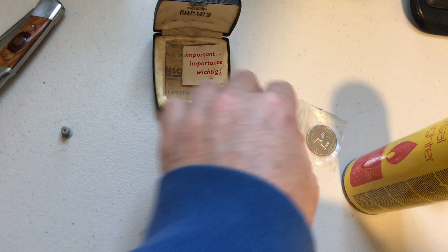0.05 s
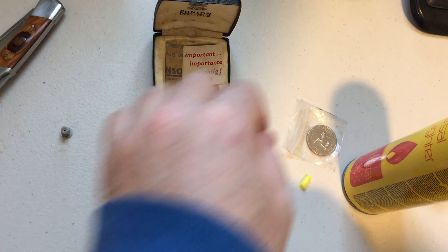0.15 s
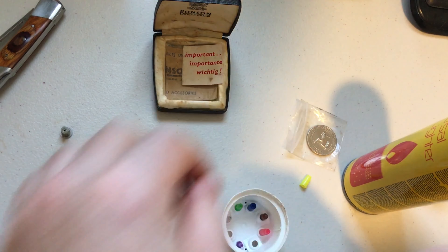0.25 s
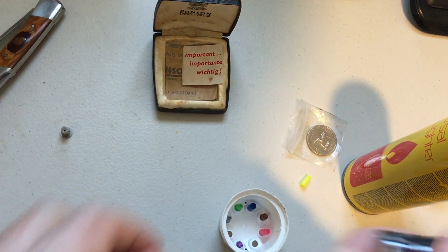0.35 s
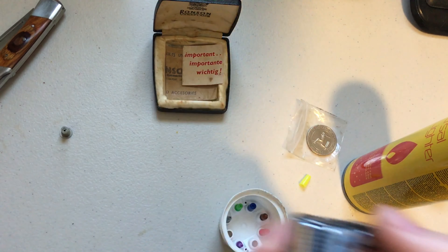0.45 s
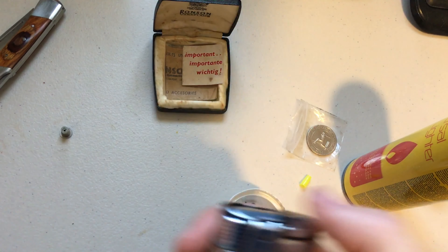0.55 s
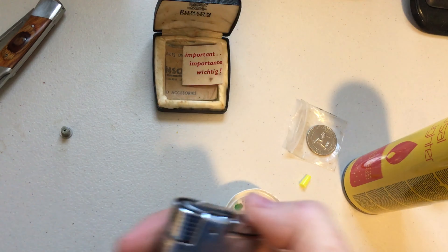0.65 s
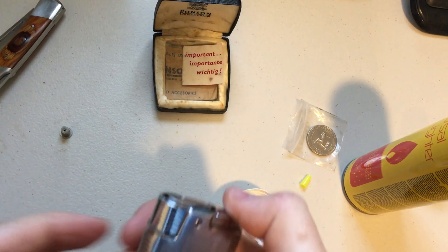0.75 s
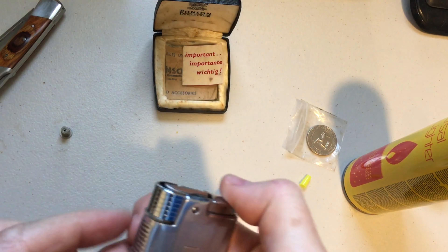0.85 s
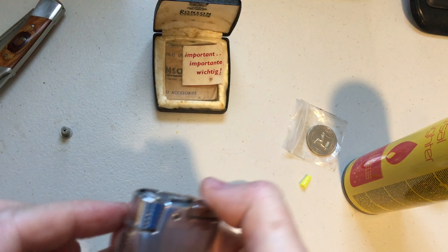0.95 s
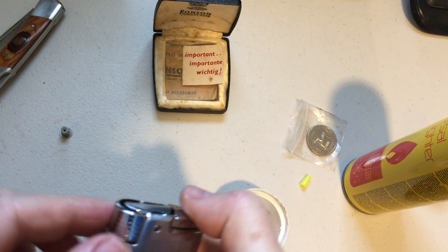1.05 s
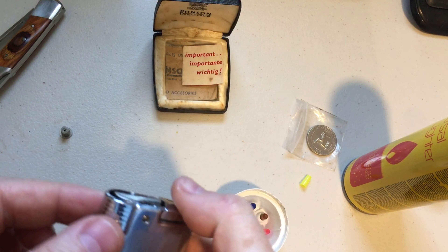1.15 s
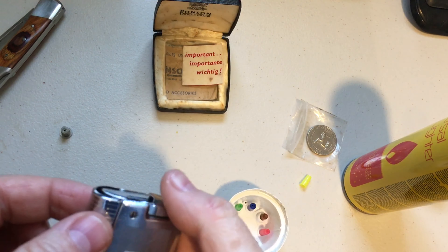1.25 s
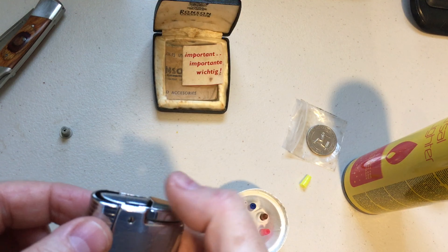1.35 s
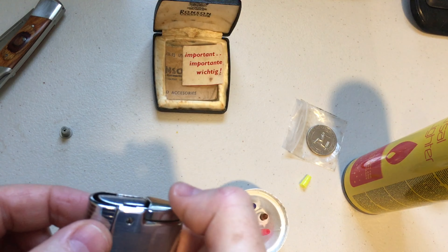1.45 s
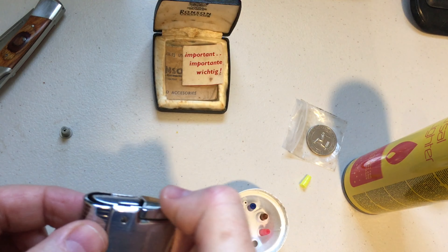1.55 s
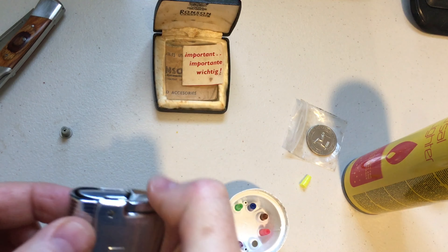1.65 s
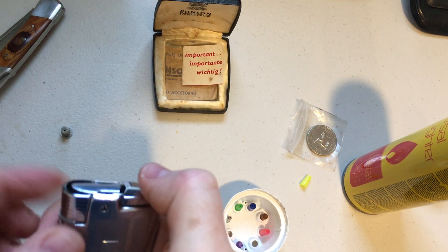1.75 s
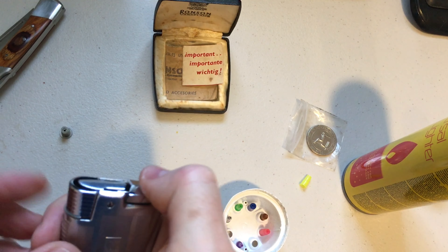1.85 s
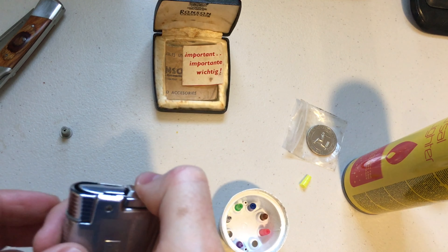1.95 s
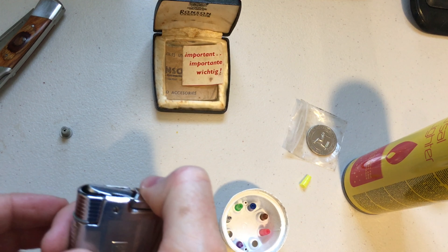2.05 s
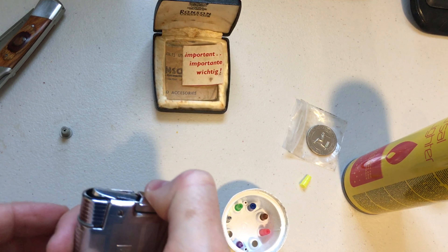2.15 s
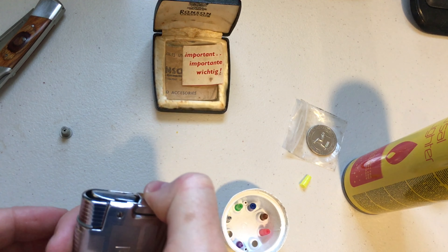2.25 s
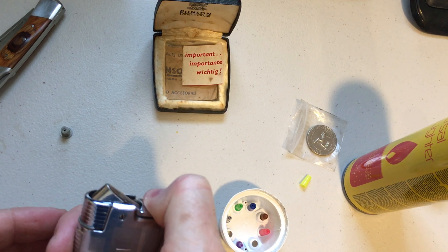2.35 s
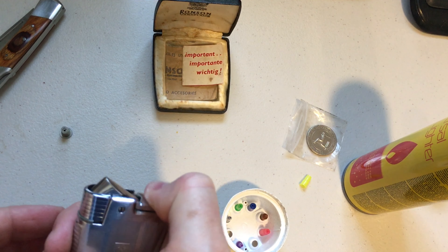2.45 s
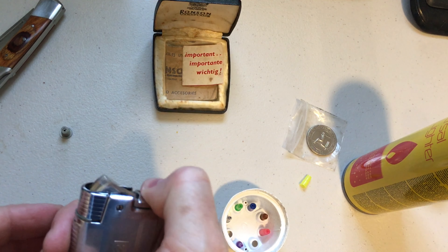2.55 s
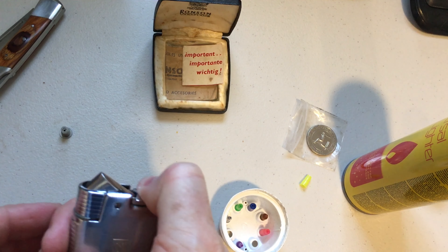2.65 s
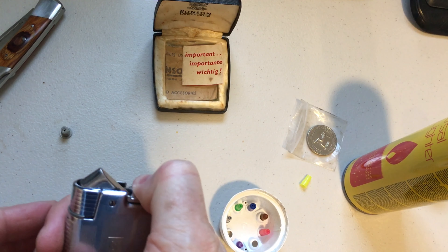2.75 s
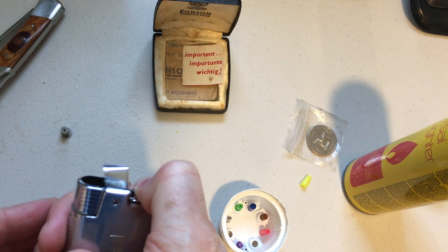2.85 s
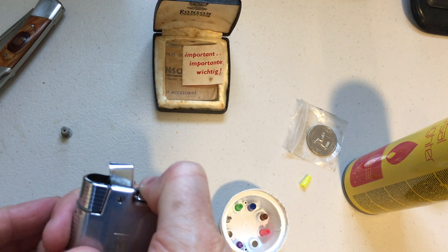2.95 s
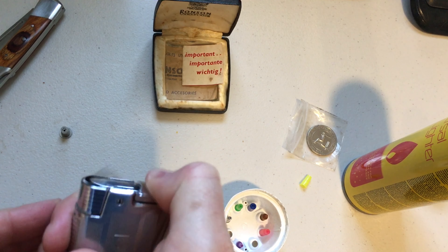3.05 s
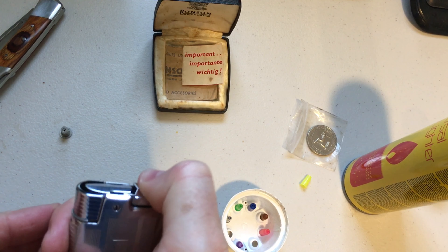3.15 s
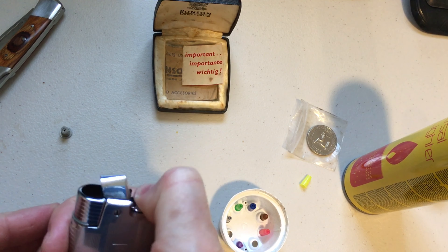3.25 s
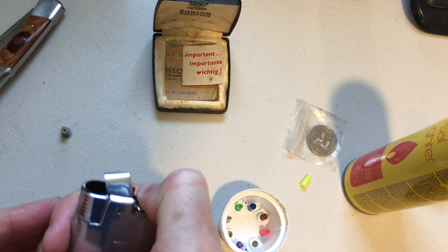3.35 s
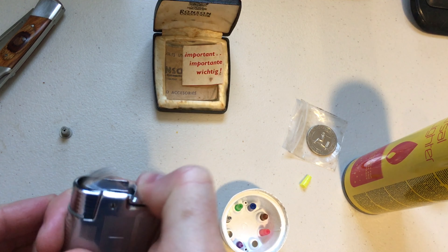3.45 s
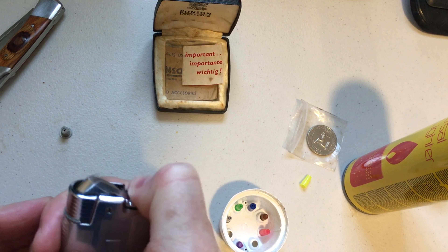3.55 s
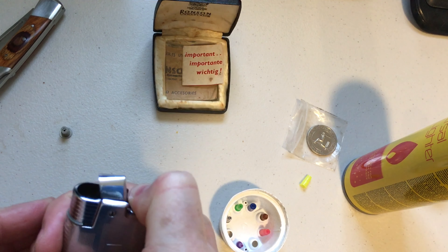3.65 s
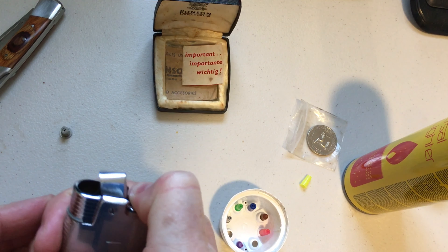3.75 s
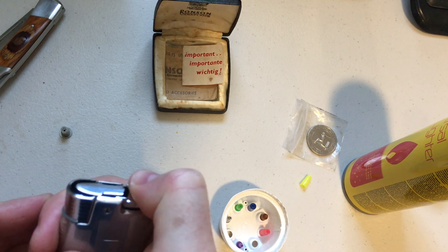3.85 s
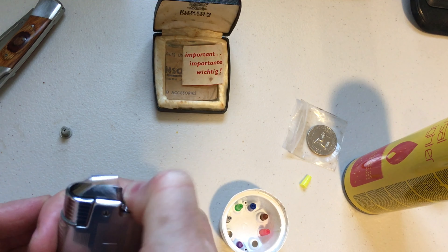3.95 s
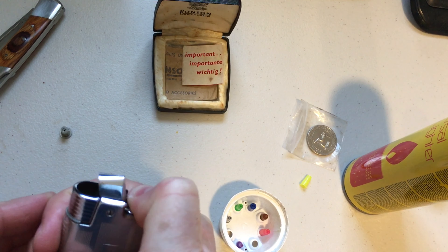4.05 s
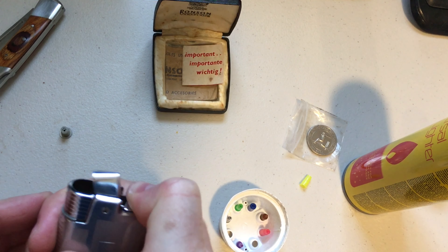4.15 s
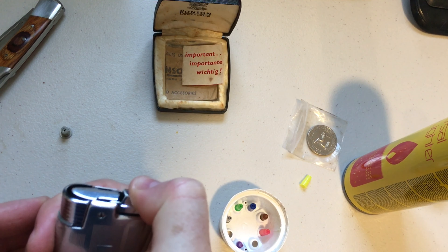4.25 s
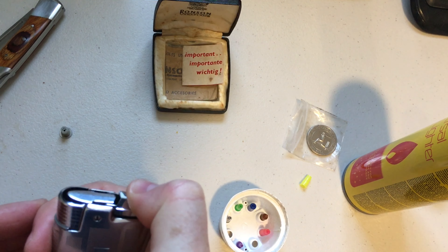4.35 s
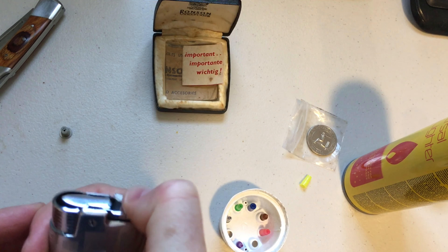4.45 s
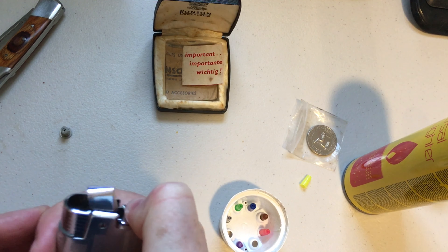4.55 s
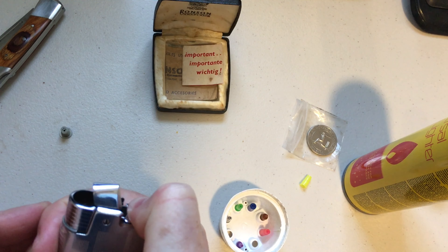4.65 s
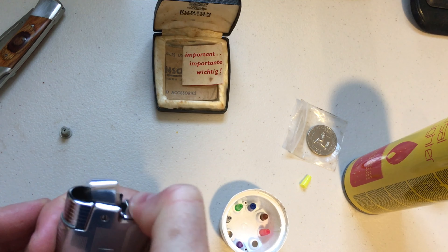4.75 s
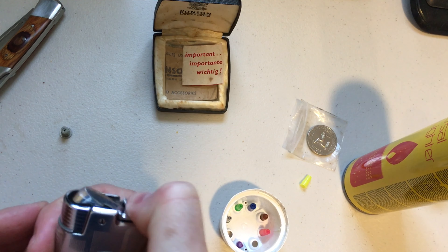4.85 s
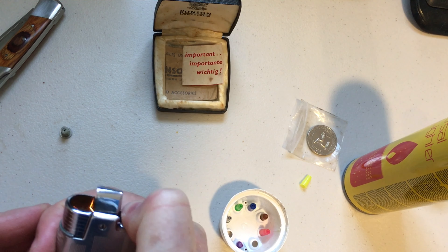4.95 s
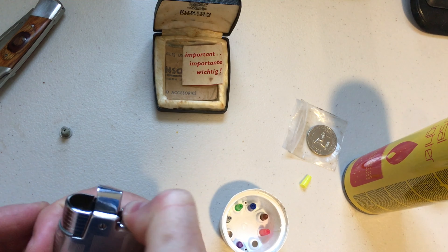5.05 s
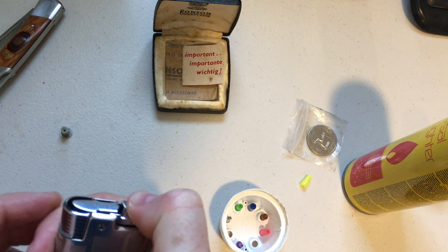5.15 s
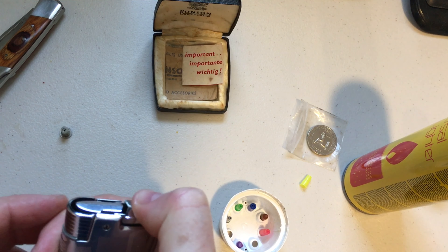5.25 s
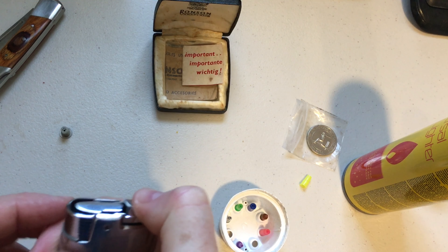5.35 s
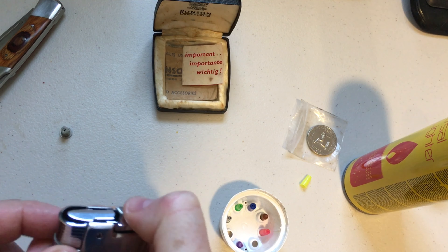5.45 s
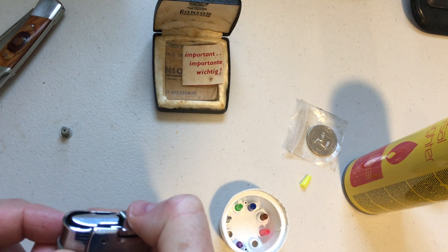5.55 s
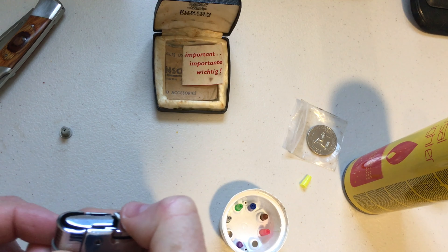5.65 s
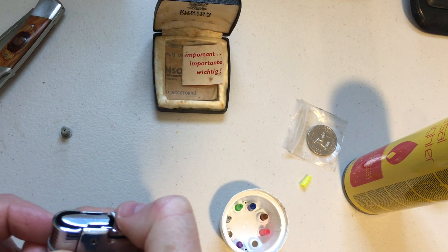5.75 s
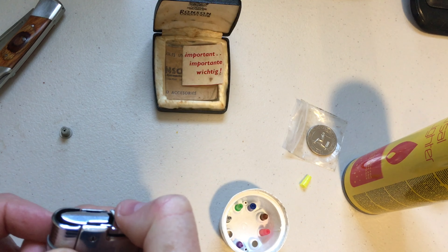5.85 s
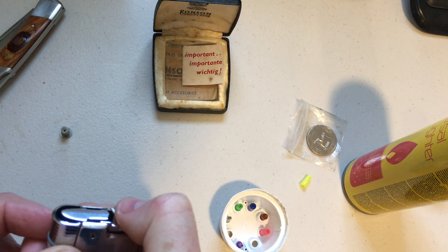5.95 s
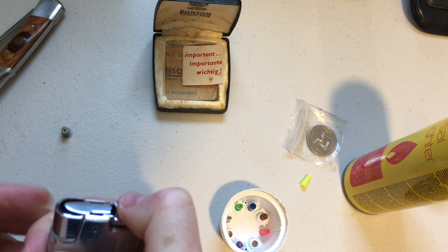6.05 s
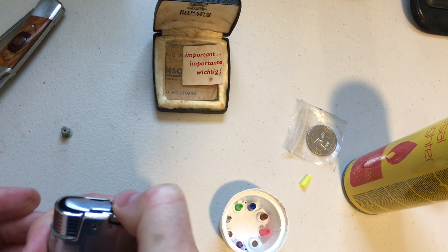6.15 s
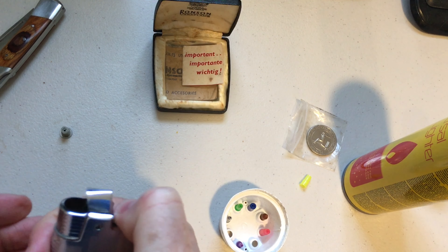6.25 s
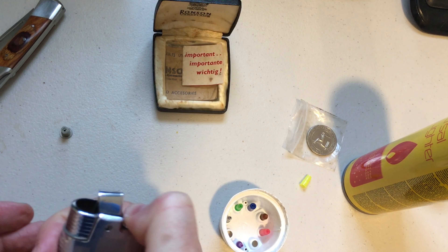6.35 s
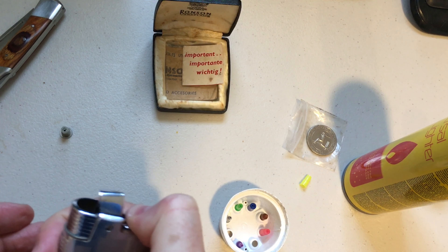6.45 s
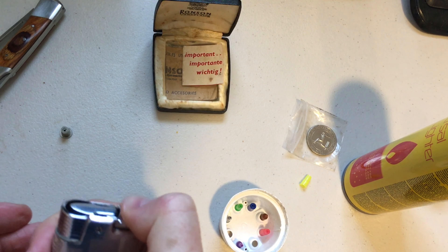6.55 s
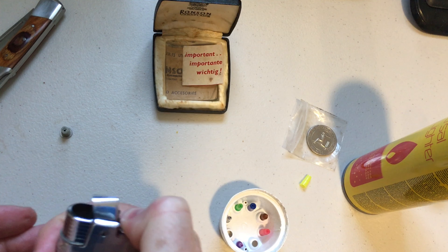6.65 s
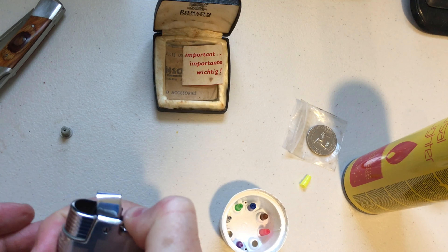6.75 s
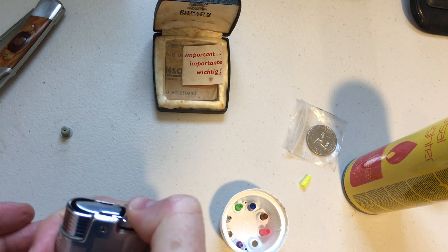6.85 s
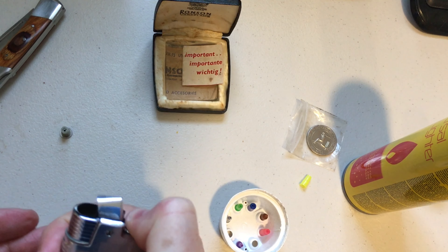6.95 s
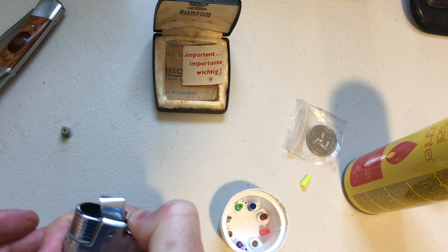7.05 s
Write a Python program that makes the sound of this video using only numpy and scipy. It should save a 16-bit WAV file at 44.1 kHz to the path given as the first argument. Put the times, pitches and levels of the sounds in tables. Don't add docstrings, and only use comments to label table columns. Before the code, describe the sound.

Close metallic clicks, flint rasps and sharp cap snaps of a lighter worked repeatedly, with gas hissing through its valve in a quiet room.

```python
import sys
import numpy as np
from scipy import signal
from scipy.fft import rfft, irfft, next_fast_len
from scipy.io import wavfile
from scipy.ndimage import uniform_filter1d

SR = 44100
rng = np.random.default_rng(int(sys.argv[2]) if len(sys.argv) > 2 else 0)


def linear_from_db(decibels):
    return 10 ** (np.asarray(decibels, float) / 20)


def wav_record(signal):
    frames = np.transpose(np.atleast_2d(signal))
    bounded = np.clip(frames, -1, 1)
    quanta = np.round(bounded * 32767).astype(np.int16)
    wavfile.write(sys.argv[1], SR, quanta)


N = 312669

# frequency in Hz, density in dB per Hz.
ROOM_SPECTRUM = [(13, -50.5), (22, -5), (152, -6.5), (278, -11.5), (310, -15.5), (347, -16), (398, -29.5),
                 (1070, -20.5), (3230, -29), (3920, -55), (5770, -42), (6810, -54), (16000, -42.5)]
ROOM_DB = -52.5
# centre in Hz, width in Hz, level in dB.
HUMS = [
    (48.7, 13, -58),
    (87, 17, -57),
    (209, 10, -66),
    (1099, 50, -74),
    (4730, 50, -76),
]
# start in seconds, end in seconds, Hz at start, Hz at end, level in dB.
WHISTLES = [
    (1.7, 2.17, 1042, 1022, -70),
    (2.19, 2.75, 997, 998, -66),
    (1.72, 2.3, 272, 270, -59.5),
    (-1, 8, 3146, 3146, -77),
]
# centre in Hz, width in Hz, level in dB, t60 in seconds.
TAIL = [(314, 160, -25, 0.34), (1140, 890, -31, 0.25), (2250, 790, -32.5, 0.17), (3640, 1400, -26, 0.22),
        (4300, 1650, -26, 0.13), (6030, 1500, -31, 0.22), (9100, 3400, -28.5, 0.22),
        (13540, 6700, -27.5, 0.2)]
# delay in ms, level in dB.
ECHOES = [
    (1.9, -9.5),
    (7.4, -22),
    (11, -34.5),
]
# time in seconds, level in dB.
SLEEVE = [
    (0, -74),
    (.15, -62),
    (.27, -64),
    (.42, -59.5),
    (.75, -62.5),
    (1.1, -73),
    (1.4, -76),
]

# time in seconds, flow in dB, turn of the nozzle toward the phone in dB.
SEEP = [(0, -70.5, 0.5), (.3, -65, 0.5), (.7, -68.5, 1), (1.17, -69, 0.5), (1.5, -68, -2.5), (2.0, -63, 1),
        (2.36, -63, 1.5), (2.69, -69.5, 10.5), (2.97, -56.5, -1), (3.15, -64.5, -1), (3.349, -56, 0),
        (4.12, -60.5, -0.5), (4.4, -59, -6), (4.72, -62, 0), (5.07, -63, -0.5), (5.26, -66, -3.5),
        (6.4, -53.5, 3), (7.09, -56.5, 1)]
# start in seconds, attack in seconds, hold in seconds, release in seconds, flow in dB.
PUFFS = [
    (1.52, 0.069, 0.16, .13, -61),
    (1.928, 0.022, 0.33, 0.098, -52),
    (5.355, 0.038, .02, 0.069, -67),
    (5.55, 0.057, .12, .1, -55.5),
    (5.583, 0.15, .35, 0.34, -49),
]
# centre in Hz, width in Hz, level in dB.
JET = [
    [(4620, 250, -10), (5200, 450, -3), (5780, 500, 0), (6450, 700, -3)],
    [(2300, 350, -7), (3080, 450, -1.5), (4100, 400, -3.5), (1500, 1500, -5)],
    [(3500, 350, 0), (2900, 1500, -5)],
    [(7300, 800, -3), (8600, 1100, 0), (9800, 900, 0)],
    [(11400, 1900, 2.5), (13000, 900, -1.5), (14100, 900, 0), (15200, 1000, -2.5)],
]
# level at the faint flow in dB, dB per dB of flow, dB per dB of turn,
# change once tipped in dB, lag in seconds.
JET_FOLLOW = [
    (-70, 1.04, .01, -0.6, 0),
    (-69, 0.69, 1.2, -3, 0),
    (-76, 0.69, .6, 6.5, 0),
    (-72.5, 0.86, 1.1, .1, .015),
    (-74.5, 0.8, 1.28, 0, .035),
]
# start in seconds, end in seconds, Hz at start, Hz at end, level in dB.
EDGES = [
    (1.94, 2.4, 11000, 10900, -63),
    (2.3, 2.85, 11700, 11100, -63.5),
    (2.0, 2.4, 14500, 14300, -65),
    (5.57, 6.02, 15000, 14000, -58),
    (5.6, 5.9, 13000, 11500, -62),
    (5.95, 6.3, 12800, 13600, -63),
    (6.28, 7.2, 6200, 6800, -62),
    (6.1, 6.35, 11300, 11300, -62),
]
FAINT_FLOW_DB, JET_DRIFT, EDGE_WIDTH_HZ = -70, .012, 900
TIPPED_S, TIP_TAKES_S = 5.2, .2

# frequency in Hz, level in dB, t60 in seconds.
SHELL = [(2020, -16, .012), (2380, -18.5, 0.013), (3280, -7, 0.0048), (3450, 0, 0.012), (3850, -2, 0.0087),
         (4150, 0.5, 0.013), (4650, -3, 0.011), (5310, -0.5, 0.011), (5950, -2, .009), (6035, -3, 0.015),
         (6805, -4.5, 0.014), (7230, -4.5, 0.026), (8150, -6.5, .008), (8830, 4, 0.0057),
         (9720, -6.5, 0.015), (11520, -5, 0.011), (11735, -7, 0.0083), (12526, -6, 0.0047),
         (13475, -2, 0.0046), (15330, -4, 0.0056), (15360, -6, .006)]
# frequency in Hz, gain in dB.
LEVER_COLOUR = [(3000, 2), (3700, -1), (5000, 0), (6000, 4), (7500, 0), (9900, -3), (12000, 0), (15000, 1)]
# frequency in Hz, gain in dB.
CAP_COLOUR = [(3000, 1), (4000, 4), (4700, 2), (5300, -6), (7000, 2), (9900, 4), (13000, -4), (15000, -2)]
# time in seconds, one centre in Hz, its gain in dB,
# other centre in Hz, its gain in dB.
GRIPS = [(2.801, 13370, -8.0, 4540, -12.0), (2.801, 3950, -8.0, 8790, -9.0),
         (3.068, 5020, 11.0, 13370, -5.0), (3.068, 2350, 10.0, 3870, 3.0), (3.249, 7190, 5.0, 2590, -12.0),
         (3.249, 3230, 4.0, 2000, -8.0), (3.477, 13640, 6.0, 4450, -5.0), (3.477, 7490, 5.0, 5220, 5.0),
         (3.588, 6380, 7.0, 9140, -12.0), (3.588, 3950, -5.0, 3110, -8.0), (3.85, 4030, 5.0, 3430, -10.0),
         (3.85, 5330, -4.0, 10520, -5.0), (3.972, 5220, 10.0, 2390, -11.0), (3.972, 6130, 5.0, 9330, -5.0),
         (4.213, 2300, 8.0, 2650, -7.0), (4.213, 6770, -5.0, 4920, -5.0), (4.559, 2040, 12.0, 14200, -7.0),
         (4.559, 6910, 7.0, 4110, 4.0), (4.796, 8610, 3.0, 2590, -8.0), (4.796, 6130, 3.0, 15080, -3.0),
         (4.94, 5550, 10.0, 3170, -12.0), (4.94, 4110, 7.0, 8790, -6.0), (5.122, 12850, 8.0, 7340, 5.0),
         (5.122, 4450, 7.0, 3170, 7.0), (6.257, 2980, 12.0, 4540, -9.0), (6.257, 2170, 12.0, 6770, -3.0),
         (6.528, 3570, 4.0, 5220, -9.0), (6.528, 13110, -7.0, 3170, -8.0), (6.64, 10730, 6.0, 6910, -7.0),
         (6.64, 5890, 5.0, 9140, -4.0), (6.852, 2350, 8.0, 5020, -12.0), (6.852, 10110, -6.0, 13110, -12.0),
         (6.958, 8790, -8.0, 2210, -12.0), (6.958, 2980, -8.0, 13640, -9.0),
         (4.49, 2980, 12.0, 2000, -12.0), (4.49, 12340, 7.0, 3430, 6.0), (3.917, 5330, 7.0, 2700, -8.0),
         (3.917, 3640, 6.0, 7050, 5.0)]
# time in seconds, Hz, dB, Hz, dB.
LIGHT_GRIPS = [
    (1.97, 3200, 8, 4150, -10),
    (.298, 1800, 4, 5000, -10),
]
GRIP_WIDTH, GRIP_HOLDS_S = .08, .022
# start in seconds, frequency in Hz, peak in dB, t60 in seconds.
FREE_RINGS = [(2.5727, 2360, -37, 0.026), (4.2935, 2380, -56, .08), (4.294, 3830, -56, .1),
              (4.4991, 2380, -28.5, 0.025), (4.861, 2350, -34.5, 0.072), (2.8015, 3420, -16.5, .05),
              (3.0725, 3900, -33, 0.12), (4.558, 4150, -24, .04), (4.9401, 4070, -18, 0.04),
              (5.125, 4674, -14, 0.042), (6.2573, 3450, -22, 0.056), (6.532, 3660, -22, 0.076),
              (6.641, 3450, -16, 0.036), (6.855, 4150, -17.5, 0.039), (6.9585, 3500, -18, 0.044)]

# peak time in seconds, peak in dB, rise in ms, shell share in dB,
# thud share in dB.
STRIKES = [
    (3.0716, -4, 0.46, -8.5, -21),
    (3.4816, -8.5, .9, -11, -11.5),
    (3.8531, -4.5, 1.1, -8.5, -17),
    (4.2184, -7, .8, -7.5, -14),
    (4.7993, -6, 1.8, -9.5, -16),
    (5.1247, -4, 1., -11.5, -17.5),
    (6.5311, -4, 1.5, -3, -14),
    (6.8542, -5, .5, -0.5, -13.5),
]
# time in seconds, peak in dB.
PAWLS = [
    (3.059, -12.5),
    (3.47, -13),
    (3.8433, -16),
    (4.2057, -13),
    (4.7894, -13.5),
    (5.1154, -16.5),
    (6.5228, -12),
    (6.8457, -16.5),
]
# peak time in seconds, peak in dB, shell share in dB, bright share in dB, thud share in dB.
SNAPS = [
    (2.8004, -2, -5.5, -2.5, -29),
    (2.8017, -12, -7, -4, -33),
    (3.2492, -5, -6, -2, -23),
    (3.5878, -3.5, -6, -2.5, -16.5),
    (3.9716, -3.5, -6.5, -2.5, -16),
    (4.5595, -6, -6.5, -1.5, -19),
    (4.9397, -1, -5.5, -4, -13.5),
    (6.2573, -4, -5, -3, -11.5),
    (6.6402, -4, -6, -2, -19),
    (6.9578, -4, -8, -1.5, -18.5),
]
# catch time in seconds, catch in dB, ms until it seats, seat in dB, seat rise in ms.
RETURNS = [
    (3.1846, -23, 12.8, -24, 1.8),
    (3.5232, -23, 15.2, -23, 0.9),
    (3.9108, -22, 13.2, -21, 1.6),
    (4.476, -22, 21.6, -16.5, 0.36),
    (4.8543, -26.5, 12.3, -29.5, 3),
    (6.1677, -30.5, 26.5, -36, 3.2),
    (6.5808, -24, 16.9, -24, 1.4),
    (6.9035, -24, 14.7, -25.5, 1.8),
]
# time in seconds, peak in dB.
SKIPS = [
    (3.1888, -27),
    (3.532, -29),
    (3.916, -27),
    (4.4855, -29),
    (4.8592, -27),
    (6.1852, -29),
    (6.5868, -23),
    (6.9106, -21.5),
]
# time in seconds, peak in
# dB.
TEETH = [(3.48, -11), (3.8553, -9), (4.2152, -16), (4.217, -10), (5.1203, -19), (5.1268, -7), (6.8567, -12),
         (4.5614, -11), (6.2593, -9), (3.9698, -24), (4.9472, -27), (4.4998, -27), (2.8085, -27)]
# time in seconds, peak in dB, rise in ms.
TOUCHES = [(2.7945, -53, 4.), (3.035, -43, 0.62), (3.2405, -32, 4.7), (3.447, -38, 1.3),
           (3.462, -37.5, 3.9), (3.577, -37, 2.9), (3.825, -39, 1.3), (3.831, -46.5, 1.4),
           (3.9579, -38, 1.5), (4.185, -36, 0.79), (4.193, -42, 3.), (4.199, -39, 2.3), (4.549, -32, 3.7),
           (4.7712, -32, .5), (5.106, -40.5, 1.1), (6.1838, -27, 0.5), (6.514, -37, 0.65), (6.83, -36, .8),
           (6.8431, -36, 1)]
# time in seconds, peak in dB, rise in ms, shell share in dB, thud share in dB.
TICKS = [(.298, -52, 1.5, 3, 15), (1.951, -45, .4, 2, -6), (1.968, -51, 1., 1, -14),
         (1.9806, -40, 0.82, 4, -22), (2.226, -39, 1.5, -6, -20), (2.3038, -36, 3.7, -4, -26),
         (2.3083, -31.5, .6, -19, -16), (2.3197, -19.5, .3, -6, -29), (2.4675, -31, 1, -7, -33),
         (2.48, -41, 1.2, -1, -19), (2.4978, -41.5, 1.9, -3, -22), (2.5435, -32, .34, -6, -18),
         (2.5666, -41, 4.8, -2, -23), (2.5723, -29, 0.22, -8.5, -20), (2.715, -46.5, 4, -5.5, 9),
         (2.7613, -37.5, 2.9, -1, -19), (2.7857, -40.5, 1.2, 2.5, 8.5), (4.294, -38.5, .55, -4, -16),
         (4.8992, -34.5, 2.3, -3, -27), (4.912, -42, 2.7, 7.5, 4), (6.939, -28, .7, -3, -31)]
# contact time in seconds, level at the contact in dB.
CAP_SLIDES = [
    (2.801, -26),
    (3.25, -28.5),
    (3.5868, -26.5),
    (3.9717, -26),
    (4.5593, -20.5),
    (4.9397, -39.5),
    (6.2564, -18),
    (6.637, -21),
    (6.958, -32),
]

# rise in ms, shell share in dB, bright share in dB, thud share in dB.
PAWL = (-0.4, -10.5, -3, -35)
BITE = (-2.6, -4.5, -11.5, -48.5)
CATCH = (0.1, -2.5, -9, -50)
SKIP = (1.3, -7.5, -1.5, -15)
TOOTH = (.3, -7, -3, -30)
SLIP = (0.26, -8.5, -2, -31)
# shell share in dB, bright share in dB, thud share in dB.
SEAT_SHARES_DB = (-4, -7.5, -20)
TOUCH_SHARES_DB = (-4.5, -5.5, -14)
# level at the contact in dB, level before it in dB.
PAWL_SLIDE_DB = (-30.5, -46)
CATCH_SLIDE_DB = (-31, -63)
SNAP_SLIDE_FAR_DB = -43.5
BITE_DB, BITE_AFTER_S = -14, .0072
SLIP_DB, GRIND_BRIGHT_DB = -3, -1.5
SNAP_RISE_MS, TICK_BRIGHT_DB, TICK_TRADE = 0.426, -10.5, 0.99
MIC_TOP_HZ = 15750


def level(x, db):
    return x * linear_from_db(db) / np.sqrt(np.mean(x ** 2))


def peak(f, hz, width_hz):
    return 1j * f * width_hz / (hz ** 2 - f ** 2 + 1j * f * width_hz)


def noise(shape):
    size = next_fast_len(N)
    f = np.fft.rfftfreq(size, 1 / SR) + 1
    re, im = rng.standard_normal((2, len(f)))
    return level(irfft((re + 1j * im) * shape(f), size)[:N], 0)


def walk(rate_hz):
    k = int(SR / rate_hz)
    steps = np.repeat(rng.standard_normal(N // k + 1), k)
    return 1.3 * uniform_filter1d(uniform_filter1d(steps, k), k)[:N]


def gliding(hz, width_hz):
    size = next_fast_len(N)
    re, im = rng.standard_normal((2, size))
    lowpass = 1 + (2 * np.fft.fftfreq(size, 1 / SR) / width_hz) ** 2
    slow = np.fft.ifft((re + 1j * im) / lowpass)[:N]
    carrier = np.exp(2j * np.pi * np.cumsum(hz) / SR)
    return level(np.real(slow * carrier), 0)


def room_tone():
    hz, db = np.transpose(ROOM_SPECTRUM)
    dull = lambda f: linear_from_db(np.interp(np.log(f), np.log(hz), db) - 5 * (f > 650))
    out = linear_from_db(ROOM_DB + .6 * walk(2.7)) * noise(dull)
    for hum_hz, width_hz, hum_db in HUMS:
        out += linear_from_db(hum_db + 2 * walk(6.0)) * noise(lambda f: peak(f, hum_hz, width_hz))
    t = np.arange(N) / SR
    for t0, t1, hz0, hz1, tone_db in WHISTLES:
        gate = np.clip(np.minimum(t - t0, t1 - t) / 0.013, 0, 1)
        phase = 2 * np.pi * np.cumsum(np.interp(t, [t0, t1], [hz0, hz1])) / SR
        out += np.sqrt(2) * gate * linear_from_db(tone_db + .8 * walk(23)) * np.sin(phase)
    return out


def sleeve():
    db = np.interp(np.arange(N) / SR, *np.transpose(SLEEVE))
    cloth = noise(lambda f: peak(f, 1300, 3000) ** 2 + 2.54 * peak(f, 440, 350) ** 2)
    return cloth * linear_from_db(db + 2.2 * walk(27))


def room(x, size=16384):
    t = np.arange(size) / SR
    fast = next_fast_len(N)
    f = np.fft.rfftfreq(fast, 1 / SR) + 1
    answer = np.zeros(size)
    for ms, db in ECHOES:
        late = np.maximum(t - ms / 1000, 0)
        answer += linear_from_db(db - 10) * (late > 0) * np.exp(-late / 0.00028) * rng.standard_normal(size)
    out = x + signal.fftconvolve(x, answer)[:N]
    spectrum = rfft(x, fast)
    ringing = lambda f: (np.abs(shell(f, 0, 1)) + .25) ** .8
    for hz, width_hz, db, t60 in TAIL:
        energy = irfft(spectrum * peak(f, hz, 0.57 * hz), fast)[:N] ** 2
        decay = np.exp(-2 * np.log(1000) * t / t60) * np.clip(t / 0.0025, 0, 1)
        held = np.sqrt(np.abs(signal.fftconvolve(energy, decay)[:N]))
        out += linear_from_db(db - 21.0) * held * noise(lambda f: peak(f, hz, width_hz) ** 2 * ringing(f))
    return out


def leak():
    t = np.arange(N) / SR
    s, seep_db, turn_db = np.transpose(SEEP)
    power = linear_from_db(2 * np.interp(t, s, seep_db))
    for start, attack, hold, release, db in PUFFS:
        corners_s = np.cumsum([start, attack, hold, release])
        power = power + linear_from_db(2 * np.interp(t, corners_s, [-72, db, db, -72], -200, -200))
    flow_db = 10 * np.log10(power) - FAINT_FLOW_DB
    turn_db = np.interp(t, s, turn_db)
    tipped = np.clip((t - TIPPED_S) / TIP_TAKES_S, 0, 1)
    out, flutter = 0, walk(42)
    for (base_db, per_flow, per_turn, tip_db, lag_s), peaks in zip(JET_FOLLOW, JET):
        lagged_db = np.interp(t - lag_s, t, flow_db)
        db = base_db + per_flow * lagged_db + per_turn * turn_db + tip_db * tipped
        drift = walk(3)
        for hz, width_hz, share_db in peaks:
            band = gliding(hz * (1 + JET_DRIFT * drift), width_hz)
            wander_db = 1.2 * flutter + 1.3 * walk(7)
            out = out + band * linear_from_db(db + share_db - 4.5 + wander_db)
    for t0, t1, hz0, hz1, db in EDGES:
        swell = np.sin(np.pi * np.clip((t - t0) / (t1 - t0), 0, 1)) ** .6
        band = gliding(np.interp(t, [t0, t1], [hz0, hz1]), EDGE_WIDTH_HZ)
        out = out + swell * linear_from_db(db + flutter) * band
    return out


def shell(f, scatter_db, detune):
    hz, db, t60 = np.transpose(SHELL)[:, :, None]
    signs = (-1.) ** np.arange(len(hz))[:, None]
    modes = peak(f, hz * detune, np.log(1000) / np.pi / t60) * signs
    return np.sum(linear_from_db(db + scatter_db) * modes, axis=-2)


def free_rings(size=8192):
    s, hz, db, t60 = np.transpose(FREE_RINGS)[:, :, None]
    t = np.arange(size) / SR
    wobble = 1 + 0.028 * uniform_filter1d(rng.standard_normal((len(s), size)), size=120, axis=1) * 11
    tone = np.sin(2 * np.pi * np.cumsum(hz * wobble, axis=1) / SR)
    sound = linear_from_db(db - 60 * t / t60) * (1 - np.exp(-t / .0008)) * tone
    line = np.zeros(N + size)
    np.add.at(line, (s * SR).astype(int) + np.arange(size), sound)
    return line[:N]


def approaches():
    pawls = [(row[0], *PAWL_SLIDE_DB) for row in PAWLS]
    catches = [(row[0], *CATCH_SLIDE_DB) for row in RETURNS]
    return pawls + catches + [(*row, SNAP_SLIDE_FAR_DB) for row in CAP_SLIDES]


def slides():
    t, swell = np.arange(N) / SR, np.zeros(N)
    before_s = np.array([0.038, 0.012, -0.0051, -0.005, -0.01])
    for s, near_db, far_db in approaches():
        swell += linear_from_db(np.interp(t, s - before_s, [-70, far_db, near_db, near_db, -70], -200, -200))
    grit = noise(lambda f: shell(f, 0, 0.88) + linear_from_db(1.5) * peak(f, 8300, 13000))
    return swell * grit * linear_from_db(2 * walk(500) - 1)


def colour(f, cap):
    lever_db = np.interp(f, *np.transpose(LEVER_COLOUR))
    cap_db = np.interp(f, *np.transpose(CAP_COLOUR))
    return linear_from_db(np.where(cap > 0, cap_db, lever_db))


def grip(f, s):
    bump = lambda hz: np.exp(-(np.log(f / hz) / GRIP_WIDTH) ** 2)
    db = 0
    for at, one_hz, one_db, other_hz, other_db in list(GRIPS) + list(LIGHT_GRIPS):
        held = np.abs(s - at) < GRIP_HOLDS_S
        db = db + held * (one_db * bump(one_hz) + other_db * bump(other_hz))
    return linear_from_db(db)


def hits():
    rows = []
    for (s, db, rise_ms, low_db, thud_db), (pawl_s, pawl_db) in zip(STRIKES, PAWLS):
        rows += [(s, db, rise_ms, low_db, GRIND_BRIGHT_DB, thud_db),
                 (pawl_s, pawl_db, *PAWL),
                 (pawl_s + BITE_AFTER_S, BITE_DB, *BITE),
                 (s + .0003, db + SLIP_DB, *SLIP)]
    for s, db, span_ms, seat_db, rise_ms in RETURNS:
        rows += [(s, db, *CATCH), (s + span_ms / 1000, seat_db, rise_ms, *SEAT_SHARES_DB)]
    rows += [(*row, *SKIP) for row in SKIPS]
    rows += [(*row, *TOOTH) for row in TEETH]
    rows += [(*row, *TOUCH_SHARES_DB) for row in TOUCHES]
    for s, db, rise_ms, low_db, thud_db in TICKS:
        bright_db = TICK_BRIGHT_DB - TICK_TRADE * low_db
        rows.append((s, db, rise_ms, low_db, bright_db, thud_db))
    snaps = [(s, db, SNAP_RISE_MS, *shares_db, 1) for s, db, *shares_db in SNAPS]
    return [(*row, 0) for row in rows] + snaps


def contacts(size=2048, lead=256):
    s, peak_db, rise_ms, low_db, top_db, thud_db, cap = np.transpose(hits())[:, :, None]
    t = (np.arange(size) - lead) / SR
    f = np.fft.rfftfreq(size, 1 / SR) + 1
    chance = rng.standard_normal((len(s), size + 2 * len(SHELL)))
    share, shift = np.split(chance[:, size:, None], 2, axis=1)
    rise_s = np.clip(rise_ms - .35, .1, 4) * 0.00097
    release = np.exp(-np.maximum(t, 0) / (0.00037 + 1.25 * rise_s))
    push = np.where(t < 0, np.exp(np.minimum(t, 0) / rise_s), release)

    rattle = rfft(push * chance[:, :size])
    rattle = rattle / uniform_filter1d(np.abs(rattle), size=13, axis=1) ** 0.8
    crack = linear_from_db(-9 - .3 * peak_db) * peak(f, 8000 - 2500 * (peak_db < -19), 10000) ** 2
    ring = rattle * (shell(f, 1.2 * share, 1 + shift / 70) + crack) * colour(f, cap)

    low, top = f < 5500, f > 9000
    middle = np.clip(1 - linear_from_db(2 * low_db) - linear_from_db(2 * top_db), .02, 1)
    balance = 0
    for band, gain in ((low, linear_from_db(low_db)), (top, linear_from_db(top_db)), (~low & ~top, np.sqrt(middle))):
        energy = np.sum(np.abs(ring * band) ** 2, axis=1, keepdims=True)
        balance = balance + band * gain / np.sqrt(energy)
    held = grip(f, s)
    ring = irfft(ring * held * uniform_filter1d(balance, size=25, axis=1), size)
    ring = ring * np.exp(np.minimum(t, 0) / (3.2 * rise_s))

    knock = 10.2 * (t == 0) + 0.41 * push * chance[:, size - 1::-1]
    hand = peak(f, 1620, 1800) ** 2 - linear_from_db(-6.5 + .25 * peak_db) * peak(f, 270, 430)
    thud = irfft(rfft(knock) * held * hand, size)

    top_of = lambda v: np.sqrt(uniform_filter1d(v ** 2, size=30, axis=1).max(axis=1, keepdims=True))
    sound = linear_from_db(peak_db - .6) * (ring / top_of(ring) + linear_from_db(thud_db - 2.5) * thud / top_of(thud))
    line = np.zeros(N + size)
    np.add.at(line, (s * SR).astype(int) - lead + np.arange(size), sound)
    return line[:N]


def scene():
    lighter = room(contacts() + slides() + free_rings())
    return (lighter + leak() + sleeve() + room_tone())[None]


def roll_off(x):
    return signal.sosfilt(signal.butter(12, 16620, fs=SR, output="sos"), x)


def record(dry):
    top_cut = signal.ellip(8, .3, 45, MIC_TOP_HZ, fs=SR, output="sos")
    mix = np.clip(signal.sosfilt(top_cut, dry), -1, 1)
    return roll_off(mix)


dry = scene()
out = record(dry)
wav_record(out)
```